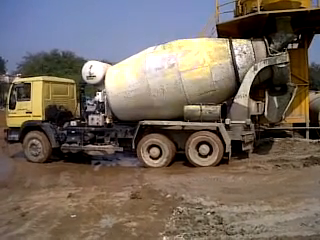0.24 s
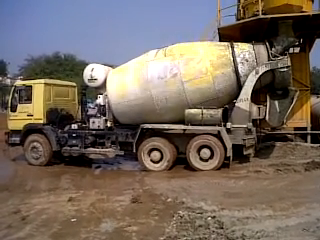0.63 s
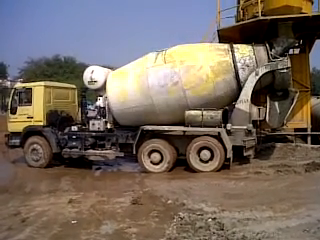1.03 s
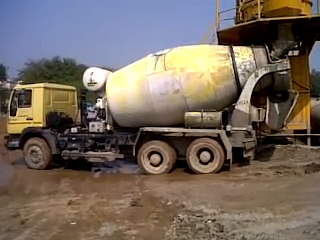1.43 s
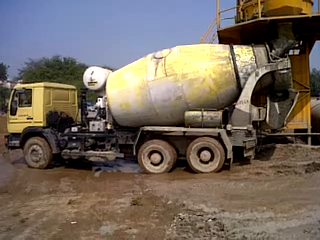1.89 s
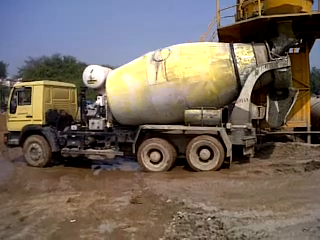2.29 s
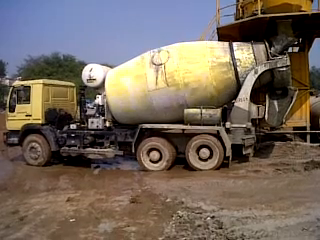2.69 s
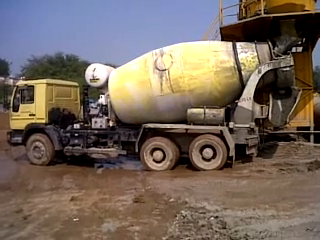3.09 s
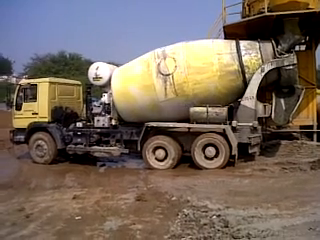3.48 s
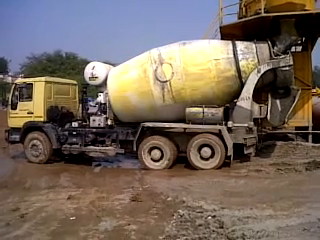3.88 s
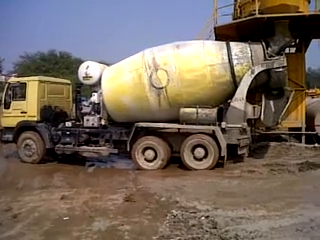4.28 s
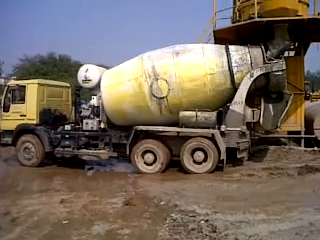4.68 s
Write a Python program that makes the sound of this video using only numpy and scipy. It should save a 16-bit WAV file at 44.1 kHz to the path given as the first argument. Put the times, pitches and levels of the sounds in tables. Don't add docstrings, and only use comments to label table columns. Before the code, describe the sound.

From 0 s a concrete mixer truck runs in an open yard, heard by one small camera microphone some way off, with dull, band-limited and slightly grainy treble. A diesel idles as a low hum under steady gear tones, faint plant hums and a mid-pitched hydraulic whine that wavers and sags. Over them runs an unbroken low roar of load falling in the hollow steel drum and a sandy rush of gravel, peppered with tiny sharp ticks and occasional dull knocks. At 1.2 s a tight volley of heavy lumps bangs the drum wall for about 0.1 s, the loudest event, with a short metallic echo. A lower thud lands near 1.6 s. About 2.1 s the engine climbs in pitch, settling higher by 2.7 s, when a second, somewhat weaker volley knocks. Further knocks come near 3.03 s; a brighter tick at 3.7 s and low thump at 4.7 s punctuate gravel continuing to about 4.9 s.

```python
import sys
import numpy as np
from scipy import signal
from scipy.fft import rfft, irfft, next_fast_len
from scipy.io import wavfile
from scipy.ndimage import uniform_filter1d, map_coordinates

SR = 44100
rng = np.random.default_rng(int(sys.argv[2]) if len(sys.argv) > 2 else 0)


def level_to_linear(level):
    exponent = np.asarray(level, float) / 20
    return 10 ** exponent


def store_wav(level_fs):
    pcm = np.round(np.clip(np.atleast_2d(level_fs), -1, 1) * 32767)
    wavfile.write(sys.argv[1], SR, pcm.T.astype(np.int16))


N = 217677
TIME = np.arange(N) / SR

# time_s, firing_rate_hz
FIRING_RATE = [
    (0, 43.4),
    (.6, 42.9),
    (1.3, 42.9),
    (1.95, 43.6),
    (2.17, 48.2),
    (2.45, 50.2),
    (2.7, 51),
    (3.5, 51.3),
    (4.6, 51.2),
    (4.94, 50.2),
]
# time_s, load_0_to_1
ENGINE_LOAD = [
    (0, 0.56),
    (.5, 0.16),
    (1.8, 0.06),
    (2.1, 1),
    (3.2, 0.8),
    (3.5, 0.1),
    (3.75, 0.6),
    (4.65, 0.34),
    (4.94, 1.3),
]
ORDERS_LIGHT = (-55.5, -54, -52, -50.5)
ORDERS_LOADED = (-50, -46, -50.5, -68.5)

GEAR_MESH = [
    (-56, -64, -54, -62, -54, -60, -52, -43.5, -53, -50, -59),
    (-62, -62, -54, -63, -54, -60, -57, -43.2, -49, -56, -60),
]
# pitch_hz, first_level_db, last_level_db, unsteadiness_hz
PLANT_HUMS = [
    (30.3, -60, -60, .2),
    (78, -60, -60, .6),
    (102, -55, -62, 1),
    (152, -59, -56, 1),
    (174, -60, -53, 1.2),
    (252, -46.5, -60, .6),
    (694, -55, -55, 2.5),
    (804, -54, -55, .4),
    (1107, -60, -60, 6),
    (2480, -66, -66, 14),
]

# time_s, piston_rate_hz
PISTON_RATE = [(0, 444), (.2, 441), (.55, 440), (.95, 444), (1.4, 439), (1.95, 440), (2.2, 447),
               (2.45, 443), (2.7, 433), (3, 440.5), (3.5, 445.5), (3.85, 442), (4.1, 435), (4.3, 437.5),
               (4.6, 444), (4.94, 447)]
# time_s, level_db
PUMP_PRESSURE = [(0, -41.5), (.6, -42), (1.1, -44.5), (1.7, -43.5), (2.2, -44), (2.6, -46), (3.1, -42.5),
                 (3.6, -47), (4.15, -41.5), (4.5, -45), (4.94, -48)]

# time_s, level_db
FALLING_LOAD = [(0, -36), (.56, -40.5), (1.2, -34.5), (1.5, -37), (2.13, -38.5), (2.6, -37.5), (2.97, -36),
                (3.31, -39), (3.68, -38), (4.04, -38), (4.53, -36), (4.94, -38.5)]
# time_s, level_db
CHUTE_FLOW = [(0, -46.5), (.56, -48), (.76, -46.5), (1.14, -46.5), (1.48, -48.5), (1.64, -45.5),
              (1.8, -48.5), (2.13, -46.5), (2.7, -47), (3.31, -48), (3.58, -48), (3.73, -44), (3.86, -47.5),
              (4.04, -48), (4.2, -47), (4.5, -48), (4.94, -47)]
# frequency_hz, density_db
RUMBLE_SPECTRUM = [(10, -57), (22, -28.5), (40, -10), (70, -1), (130, 0), (250, 2.5), (350, 1), (420, -1),
                   (600, -31.5), (1200, -120)]
# frequency_hz, density_db
ROAR_SPECTRUM = [(120, -120), (250, -30.5), (400, -11), (480, -3), (650, 1), (760, -3.5), (1130, -5.5),
                 (1400, -11.5), (1700, -14), (2000, -31), (2600, -35.5), (4000, -120)]
# frequency_hz, density_db
RUSH_SPECTRUM = [(600, -120), (1200, -30), (1900, -2.5), (2450, 2.5), (3000, -1), (3730, -1.5),
                 (4250, -7.5), (4790, -20), (5400, -35), (7000, -120)]
# frequency_hz, density_db
FIZZ_SPECTRUM = [(2500, -120), (3800, -24), (4700, -1.5), (5300, 0), (6300, 0.5), (6900, -5), (8000, 3),
                 (11000, -120)]

# start_s, peak_db, low_mode_hz, high_mode_hz, high_mode_db
HEAVY_LUMPS = [(1.206, -19, 705, 1064, 0.5), (1.2176, -8, 561, 1036, -1), (1.2268, -4, 540, 1035, -9),
               (1.2324, -16, 527, 1040, -9.5), (1.2415, -17, 515, 890, -3.5), (1.248, -23, 872, 1056, 2),
               (1.259, -16, 337, 880, -13), (1.271, -18, 498, 960, -13), (1.2855, -20, 580, 880, -14),
               (1.299, -39, 265, 1030, -12), (1.2, -32, 184.6, 994, -20), (1.232, -21, 200, 1587, -11),
               (1.293, -25, 165, 990, -18.5), (1.596, -14, 248, 1020, -21), (2.698, -19, 306, 1267, -11),
               (2.726, -25.5, 208, 990, -18), (2.655, -19.5, 622, 964, -13), (2.665, -22.5, 613, 1440, -4),
               (2.675, -16, 570, 1000, 3), (2.6912, -8, 494, 946, -2.5), (2.6972, -19, 438, 890, 1),
               (2.7035, -18.5, 458, 863, 0.5), (2.722, -26.5, 540, 1050, 2), (2.742, -25, 625, 953, 6.5),
               (2.777, -16, 488, 900, -11), (3.032, -21, 455, 1300, -10), (3.037, -17.5, 667, 1300, -5)]
# start_s, peak_db, low_mode_hz, high_mode_hz, high_mode_db
LIGHT_LUMPS = [(.141, -24, 295, 896, -8), (0.456, -28, 540, 970, -18), (.6455, -25, 600, 980, -8),
               (.764, -31, 556, 842, 8), (.788, -24, 592, 980, 4.5), (.848, -30, 554, 977, 9),
               (.857, -24, 614, 1050, -3), (1.632, -37, 560, 1066, 9.5), (1.669, -18, 401, 987, -4.5),
               (1.853, -25, 557, 934, 3), (1.912, -33, 598, 1130, 5), (2.16, -23.5, 624, 1015, -17),
               (2.21, -24, 554, 1004, -12), (2.383, -27.5, 606, 880, 5.5), (2.452, -22.5, 601, 1330, -2),
               (2.461, -19.5, 596, 920, 3), (2.474, -19.5, 607, 897, 0.5), (2.561, -22.5, 634, 1054, -7.5),
               (2.594, -22.5, 548, 940, -3), (2.636, -28, 547, 1103, 5), (3.161, -29, 616, 1010, -18),
               (3.601, -35, 557, 1120, 3), (3.655, -23, 520, 1006, -4.5), (3.734, -23.5, 365, 915, -2),
               (3.772, -28.5, 665, 1130, 2.5), (3.862, -24, 570, 910, -20), (4.124, -33, 574, 1076, 8),
               (4.21, -25, 606, 970, -18), (4.326, -37, 613, 1134, 2), (4.343, -26, 560, 1143, 0),
               (4.363, -37, 542, 1000, 2), (4.408, -25, 496, 996, -2), (4.475, -34.5, 605, 1290, 6),
               (4.705, -17, 263, 826, -20), (4.74, -22, 550, 825, 0), (4.828, -23, 560, 810, 3),
               (2.92, -23, 645, 1000, -6)]
# start_s, peak_db, low_mode_hz, high_mode_hz, high_mode_db
FURTHER_LUMPS = [(.026, -26, 500, 1010, -7), (.122, -29, 547, 1020, 4), (.408, -20.5, 550, 1010, -15),
                 (1.423, -20, 565, 1010, -8), (1.891, -32, 570, 1020, 4), (2.979, -26, 546, 1010, -13),
                 (3.643, -24.5, 560, 995, -2), (3.678, -22.5, 572, 990, -10), (4.226, -24, 592, 1000, -15),
                 (4.272, -33, 586, 1050, -4), (4.287, -40, 596, 1120, -3), (4.337, -35, 605, 1053, 6),
                 (1.291, -29, 586, 880, -14), (2.686, -28, 500, 988, -1.5), (1.2243, -19, 540, 1017, 9.5)]

# start_s, peak_db, blade_mode_hz, top_db
BLADE_STONES = [(0.0131, -40, 2850, -2.5), (0.0591, -30, 3460, -14), (0.1132, -41.5, 3120, -3),
                (0.2926, -43, 2920, 0), (0.7179, -33, 3040, -9), (0.8093, -28, 3450, -15),
                (0.8155, -30.5, 3480, -18), (1.0541, -46.5, 3360, 2.5), (1.2271, -25, 3200, -30),
                (1.3222, -38.5, 3600, -10), (1.3277, -32, 3380, -16), (1.6, -36, 2850, -11),
                (1.637, -30.5, 3640, -20), (1.6423, -33.5, 3670, -9), (1.7371, -36, 3310, -11),
                (1.7881, -34.5, 3210, -15), (1.8266, -30.5, 3100, -16), (1.9077, -30, 3380, -16),
                (1.9403, -30.5, 3170, -12), (1.9936, -27, 3770, -13), (1.9983, -30, 3260, -15),
                (2.1888, -26, 3420, -18), (2.2577, -27, 3370, -17), (2.3599, -29, 3300, -16.5),
                (2.3648, -34, 3510, -10), (2.4718, -46, 2630, 0), (2.4747, -39, 2730, -3),
                (2.4794, -39.5, 3100, -7), (2.5843, -29, 3640, -10), (2.6035, -27.5, 3400, -14),
                (2.6606, -41, 2680, -3), (2.8199, -35.5, 3140, -11), (2.877, -30.5, 3510, -12),
                (2.9731, -32, 3380, -14), (3.0035, -37, 3060, -8), (3.0284, -34, 3130, -5.5),
                (3.2808, -29.5, 3040, -17), (3.2844, -32, 3310, -16.5), (3.4261, -31.5, 3540, -15),
                (3.4292, -32, 3120, -15), (3.5267, -31.5, 3320, -9.5), (3.6635, -33, 3200, -10),
                (3.722, -24.5, 3260, -14), (3.7251, -22.5, 3640, -21), (3.767, -32, 3300, -17),
                (4.0869, -37, 3100, -8), (4.107, -41.5, 3230, -2.5), (4.1439, -31.5, 3150, -14),
                (4.2058, -31.5, 3560, -8), (4.7901, -27.5, 3160, -28)]
# start_s, peak_db, top_db
LIGHT_STONES = [(0.3085, -32, -14), (0.3164, -37, -8), (0.3227, -40.5, -10), (0.4654, -37, -14),
                (0.5185, -44, -6), (0.5279, -36, -12), (0.537, -38.5, -10), (0.7239, -28, -16),
                (0.7713, -33, -16), (0.9555, -41, -18), (0.9695, -43, -16.5), (1.2339, -43.5, -5),
                (1.3576, -31, -19), (1.5474, -35.5, -15.5), (1.5614, -46, 1.5), (1.6077, -33, -13),
                (1.6449, -36.5, -15), (1.6823, -35, -20), (1.9626, -33, -18), (2.0449, -45, -6),
                (2.1016, -38, -9), (2.1097, -34, -21), (2.2056, -36, -10), (2.2643, -33.5, -11),
                (2.3727, -32.5, -26), (2.5967, -33, -17.5), (2.8239, -35, -25), (3.0479, -32, -22),
                (3.0645, -35.5, -17), (3.3044, -33, -20.5), (3.3702, -38, -10.5), (3.4051, -33.5, -13),
                (3.421, -37, -14), (3.6102, -29.5, -21), (3.614, -37, -24), (3.6523, -41, -3),
                (3.7139, -32.5, -15), (3.7309, -37, -26), (3.7468, -37.5, -7), (3.7524, -36.5, -15),
                (3.7596, -36, -11), (3.7959, -41, -5), (3.9473, -36.5, -13), (3.9825, -37, -10),
                (4.1466, -39, -6), (4.1803, -34, -10), (4.2592, -36.5, -11), (4.2896, -40, -9),
                (4.3088, -49, 1.5), (4.3177, -47, 3), (4.4964, -36.5, -13), (4.5259, -33, -15),
                (4.5772, -33, -12), (4.6319, -33, -11.5), (4.6573, -31.5, -16), (4.6835, -31.5, -23),
                (4.7782, -45, -7), (4.7863, -38, -9), (4.8912, -53, -1), (4.9103, -44.5, -11)]
# start_s, peak_db, top_db
FAINT_STONES = [(0.021, -37, -19), (0.023, -43, -25), (0.0541, -37, -13), (0.0647, -46, -24),
                (0.094, -38, -10), (0.0984, -40.5, -26), (0.123, -29, -20), (0.1694, -39, -12.5),
                (0.4896, -39, -16.5), (0.5045, -42, -6), (0.534, -36, -24), (0.5674, -42, -12),
                (0.73, -39.5, -8), (0.8128, -34, -14), (0.8222, -39, -12), (1.0444, -38, -18),
                (1.2417, -31.5, -21), (1.3776, -43, -9), (1.5324, -35, -21), (1.577, -44, -6),
                (1.6546, -41, -11), (1.8773, -34, -18), (1.9113, -31.5, -22), (2.006, -36, -13),
                (2.0178, -32, -29), (2.0657, -41, -13), (2.0713, -37, -25), (2.146, -35, -23),
                (2.1755, -32, -22), (2.1967, -37, -27), (2.2135, -37, -25), (2.228, -35.5, -22),
                (2.2708, -32, -24), (2.3492, -35.5, -14), (2.4645, -46, -6), (2.6737, -42, -9),
                (2.88, -35.5, -13), (2.9344, -45, -5), (3.007, -35, -16), (3.0258, -39, -16),
                (3.287, -38, -18), (3.3115, -39, -13), (3.6024, -32.5, -21.5), (3.7017, -37, -12),
                (3.7572, -38, -12), (3.777, -37, -22), (3.847, -42, -9), (4.003, -45, -7),
                (4.102, -35, -15), (4.1499, -34, -16), (4.1984, -35, -17), (4.233, -35.5, -9),
                (4.2767, -42, -3), (4.3217, -32.5, -19), (4.357, -37.5, -12), (4.4896, -35, -12.5),
                (4.6384, -33, -13), (4.687, -38, -13), (4.8939, -42, -9), (4.8994, -47, -15)]

# frequency_hz, t60_s
DRUM_RINGING = [(200, 0.35), (1000, 0.56), (3500, 0.35), (7000, 0.12)]
# frequency_hz, level_db
CAMERA_BAND = [(6600, 1.5), (7000, -1.5), (7400, -14.5), (7800, -26), (8600, -48), (11000, -120)]
# start_s, length_s
COARSE_MOMENTS = [(.119, .045), (.334, .025), (.572, .036), (.871, .06), (1.257, .052), (1.582, .015),
                  (1.701, .04), (2.226, .02), (2.406, .05), (3.236, .025), (3.885, .04), (4.717, .05)]


def unit(x):
    return x / np.sqrt(np.mean(x ** 2) + 1e-20)


def along(points, hz):
    f, v = np.transpose(points)
    return np.interp(np.log(hz + 1), np.log(f + 1), v)


def curve(rows):
    s, value = np.transpose(rows)
    return np.interp(TIME, s, value)


def wobble(rate):
    return map_coordinates(rng.standard_normal(int(N * rate / SR) + 4), [TIME * rate])


def filtered(x, spectrum):
    m = next_fast_len(N + 8192)
    gain = level_to_linear(along(spectrum, np.fft.rfftfreq(m, 1 / SR)))
    return irfft(rfft(x, m) * gain, m)[:N]


def coloured(x, spectrum):
    return unit(filtered(x, spectrum))


def patchy(depth_db):
    z = signal.stft(rng.standard_normal(N), nperseg=512)[2]
    field = uniform_filter1d(rng.standard_normal(z.shape), 5, 0)
    field = unit(uniform_filter1d(field, 6, 1))
    return signal.istft(z * level_to_linear(depth_db * field), nperseg=512)[1][:N]


def band(hz, sharpness, count):
    b, a = signal.iirpeak(hz, sharpness, SR)
    once = signal.lfilter(b, a, rng.standard_normal(count + 500))
    return unit(signal.lfilter(b, a, once)[500:])


def tone(hz, db, zero_s=None):
    start = rng.random() if zero_s is None else -hz * zero_s
    cycles = np.cumsum(hz * np.ones(N)) / SR + start
    return np.sqrt(2) * level_to_linear(db) * np.sin(2 * np.pi * cycles)


def plant_hums():
    out = np.zeros(N)
    for hz, first_db, last_db, drift_hz in PLANT_HUMS:
        level_db = np.linspace(first_db, last_db, N) + min(3, 3.5 * drift_hz) * wobble(4)
        out += tone(hz + drift_hz * wobble(6), level_db)
    return out


def gears():
    shaft_hz, teeth = 15.98, 18
    swell_s, wear_db_per_s = 4.8, 1.2
    out = np.zeros(N)
    for harmonic, row in enumerate(GEAR_MESH, 1):
        lowest = teeth * harmonic - len(row) + 4
        for order, db in enumerate(row, lowest):
            near_double = abs(order - 2 * teeth) < 2
            wear_db = wear_db_per_s * (TIME - 3) * (order == 2 * teeth + 1)
            level_db = db + wear_db + 1.2 * wobble(6)
            out += tone(order * shaft_hz, level_db, swell_s if near_double else None)
    return out


def engine():
    firing_hz, load = curve(FIRING_RATE), curve(ENGINE_LOAD)
    out = np.zeros(N)
    for order, (light_db, loaded_db) in enumerate(zip(ORDERS_LIGHT, ORDERS_LOADED), 1):
        level_db = light_db + load * (loaded_db - light_db) + 0.78 * wobble(6.8)
        out += tone(order * firing_hz, level_db)
    return out


def pump():
    piston_hz = curve(PISTON_RATE)
    push_db = curve(PUMP_PRESSURE) + 2.0 * wobble(8)
    strain_db = 8 * np.exp(-((TIME - 4.78) / .13) ** 2)
    half_db = -58.5 + 0.91 * TIME + strain_db
    main = tone(piston_hz + 2.1 * wobble(25), push_db + 1.9 * wobble(26))
    half = tone(piston_hz / 2, half_db + 3 * wobble(4.5))
    upper = tone(3 / 2 * piston_hz, push_db - 14.5 + 3 * wobble(5))
    return main + half + upper


def flow():
    fall_db, rush_db = curve(FALLING_LOAD), curve(CHUTE_FLOW)
    fall_swing_db = fall_db - fall_db.mean()
    rumble_db = fall_db.mean() + 1.1 * fall_swing_db
    roar_db = fall_db.mean() + 0.37 * fall_swing_db
    fizz_db = -64.5 + 0.7 * (rush_db - rush_db.mean())
    hits = (rng.random(N) < 400 / SR) * level_to_linear(4 * rng.exponential(size=N).clip(0, 2.5))
    bursts = signal.fftconvolve(hits, level_to_linear(-np.arange(40) * 1.))[:N]
    stones = unit(bursts * rng.standard_normal(N))
    slosh_db = 1.05 * wobble(22.053)
    rumble = level_to_linear(rumble_db - 2.0) * coloured(patchy(1.3), RUMBLE_SPECTRUM)
    roar = level_to_linear(roar_db + 1.11 + 0.19 * wobble(16)) * coloured(patchy(1.3) + .15 * stones, ROAR_SPECTRUM)
    rush = level_to_linear(rush_db + .3 + slosh_db) * coloured(patchy(.9) + .35 * stones, RUSH_SPECTRUM)
    fizz_db = fizz_db + 1.4 * slosh_db + 0.52 * wobble(45)
    fizz = level_to_linear(fizz_db) * coloured(patchy(1.8) + .8 * stones, FIZZ_SPECTRUM)
    return rumble + roar + rush + fizz


def ticks():
    contact_s, spit_leads_s, chips_t60_s = .0005, .0003, .034
    out, spit, chips = np.zeros(N + SR), np.zeros(N + SR), np.zeros(N + SR)
    t = TIME[:SR // 20]
    contact = (t / contact_s * np.exp(1 - t / contact_s)) ** 2
    scatter = level_to_linear(-8 - 60 * t / chips_t60_s) * (1 - np.exp(-t / .002)) ** 2

    def click(hz):
        return contact * np.sin(2 * np.pi * (hz * t + rng.random()))

    small = [(.01 + a * (TIME[-1] - .02), -39 + 3 * (2 * b - 1), -15) for a, b in rng.random((80, 2))]
    light = []
    for s, db, top_db in [*LIGHT_STONES, *FAINT_STONES, *small]:
        light.append((s, db, 3200 + 380 * np.clip(rng.normal(), -2, 2), top_db))
    for s, db, blade_hz, top_db in [*BLADE_STONES, *light]:
        at = round((s - contact_s) * SR)
        spit_at = at - round(spit_leads_s * SR)
        blade = level_to_linear(1.3) * click(blade_hz) + scatter * band(blade_hz, 3.2, count=len(t))
        out[at:][:len(t)] += level_to_linear(db) * blade
        spit[spit_at:][:len(t)] += level_to_linear(db + top_db + .8) * click(6170 + 460 * rng.normal())
        chips[at:][:len(t)] += level_to_linear(db + top_db + 1) * scatter
    bright_chips = chips[:N] * coloured(rng.standard_normal(N), FIZZ_SPECTRUM)
    return filtered(out[:N], RUSH_SPECTRUM) + filtered(spit[:N], FIZZ_SPECTRUM) + bright_chips


def knocks():
    out, t = np.zeros(N + SR), TIME[:SR // 5]
    rise = (1 - np.exp(-t / 0.0016)) ** 2
    for s, db, low_hz, high_hz, high_db in [*HEAVY_LUMPS, *LIGHT_LUMPS, *FURTHER_LUMPS]:
        t60 = 0.045 * level_to_linear(-0.3 * (db + 15.5)) * (500 / low_hz) ** 0.49
        plate_wander = low_hz / 500 * np.cumsum(rng.normal(0, .022, len(t)))
        plate = np.sin(2 * np.pi * low_hz * t + plate_wander)
        upper_wander = np.cumsum(rng.normal(0, .03, len(t)))
        upper = 1.36 * np.sin(2 * np.pi * high_hz * t + upper_wander)
        clang = level_to_linear(-10.5) * band(1420, 2.6, count=len(t))
        scrape = level_to_linear(high_db - 1.5 - 25 * t / t60) * (upper + clang)
        at = round((s - .0015) * SR)
        out[at:][:len(t)] += level_to_linear(db - 3.0 - 60 * t / t60) * rise * (plate + scrape)
    return out[:N]


def drum(x):
    hz, t, z = signal.stft(rng.standard_normal(SR // 3), SR, nperseg=256)
    decay = level_to_linear(-60 * t / along(DRUM_RINGING, hz)[:, None])
    tail = signal.istft(z * decay, SR, nperseg=256)[1]
    return signal.fftconvolve(x, tail / np.linalg.norm(tail))[:N]


def scene():
    lumps, stones = knocks(), ticks()
    hits = lumps + stones + level_to_linear(-13) * drum(lumps) + level_to_linear(-6.0) * drum(stones)
    return (plant_hums() + gears() + engine() + pump() + flow() + hits)[None]


def coarse_treble(x):
    block = 704
    n = np.arange(2 * block)
    k = np.arange(round(4600 * 2 * block / SR), block // 2)
    window = np.sin(np.pi * (n + .5) / (2 * block))
    cosines = np.cos(np.pi / block * np.outer(n + .5 + block / 2, k + .5))
    basis = window[:, None] * cosines * np.sqrt(2 / block)
    starts = np.arange(0, N + block, block)
    at = starts[:, None] + n
    lines = np.pad(x, (block, 2 * block))[at] @ basis
    nearby = np.sqrt(abs(uniform_filter1d(lines ** 2, size=40, axis=1)))
    coarse = np.zeros(len(starts))
    for s, length in COARSE_MOMENTS:
        inside = abs(starts / SR - s - length / 2) < length / 2 + .006
        coarse += level_to_linear(9.5 + 58 * length) * inside
    usual_step = level_to_linear(-53.0 + 4.8 * rng.standard_normal((len(starts), 1)))
    step = np.maximum(usual_step, coarse[:, None] * nearby / 1.04)
    group_db = 2.2 * rng.standard_normal((len(starts), len(k) // 10 + 1))
    step = step * level_to_linear(group_db[:, (k - k[0]) // 10])
    topmost = k * SR / (2 * block) > 6600
    step = step * level_to_linear(6 * abs(rng.standard_normal((len(starts), 1))) * topmost)
    error = (np.round(lines / step) * step - lines) @ basis.T
    return x + np.bincount(at.ravel(), error.ravel())[block:block + N]


def low_pass(x):
    return signal.sosfilt(signal.butter(12, 7840, fs=SR, output="sos"), x)


def record(dry):
    heard = filtered(dry[0], CAMERA_BAND)
    mix = coarse_treble(heard)[None]
    return low_pass(mix)


dry = scene()
out = record(dry)
store_wav(out)
```